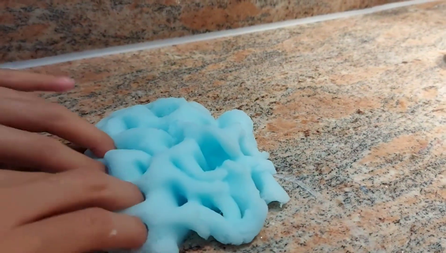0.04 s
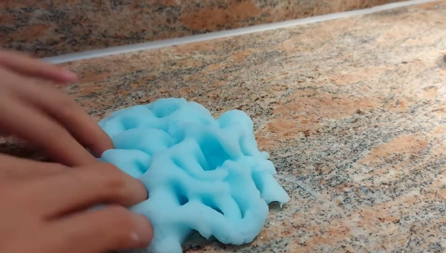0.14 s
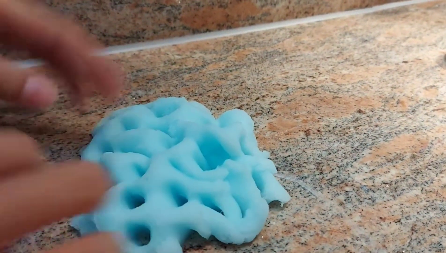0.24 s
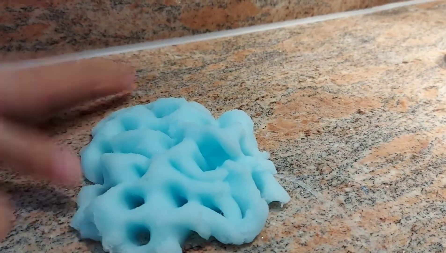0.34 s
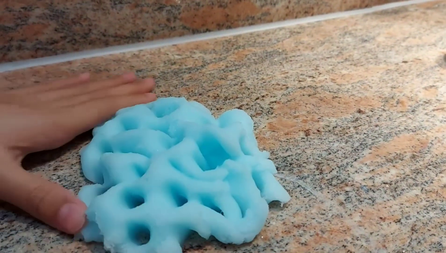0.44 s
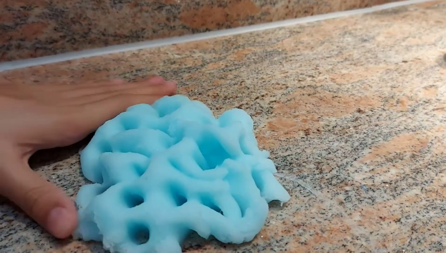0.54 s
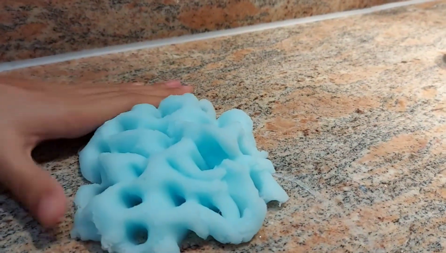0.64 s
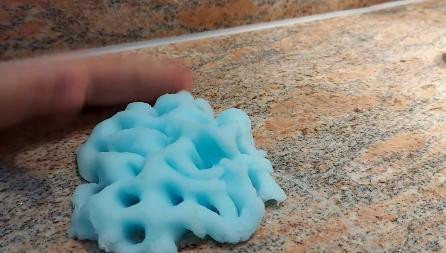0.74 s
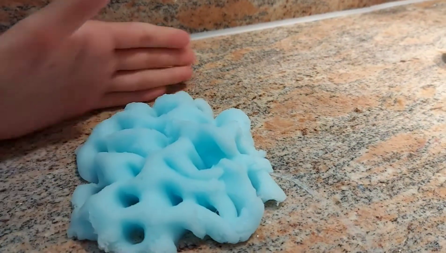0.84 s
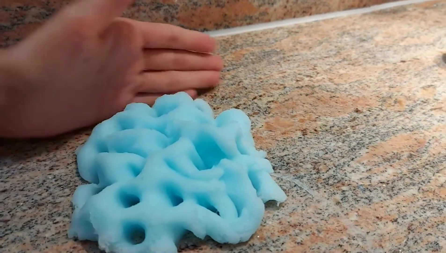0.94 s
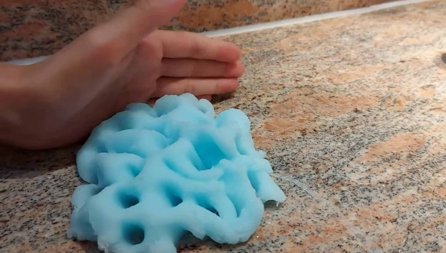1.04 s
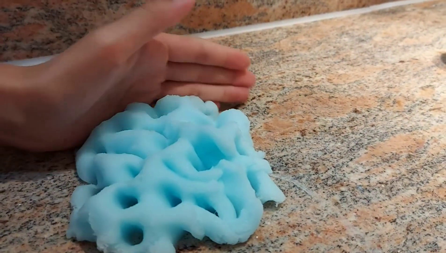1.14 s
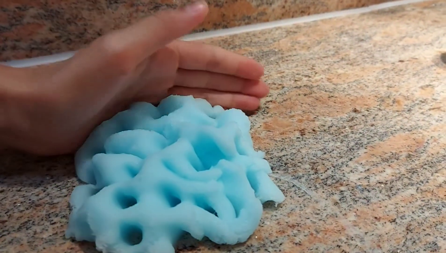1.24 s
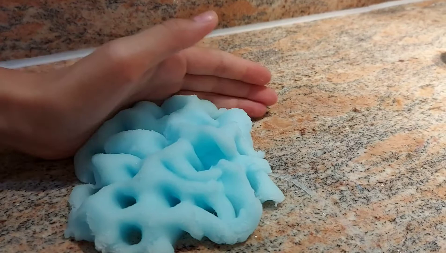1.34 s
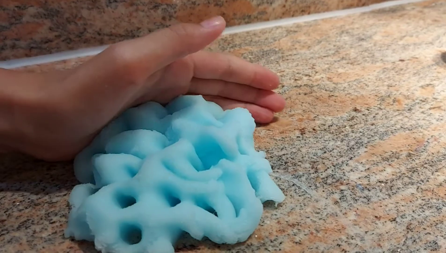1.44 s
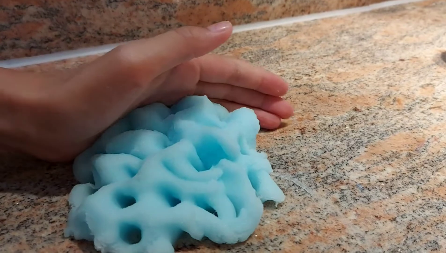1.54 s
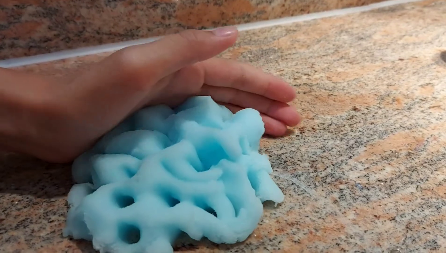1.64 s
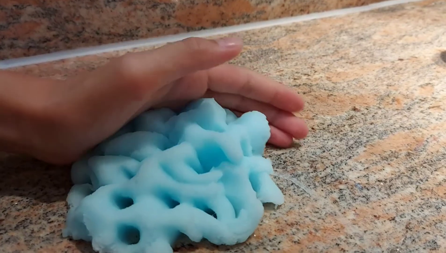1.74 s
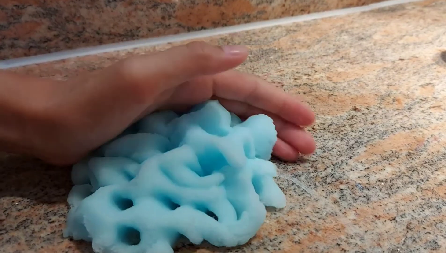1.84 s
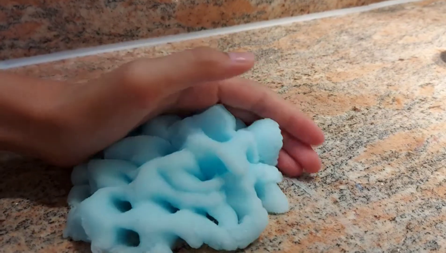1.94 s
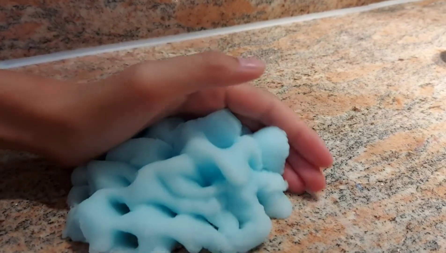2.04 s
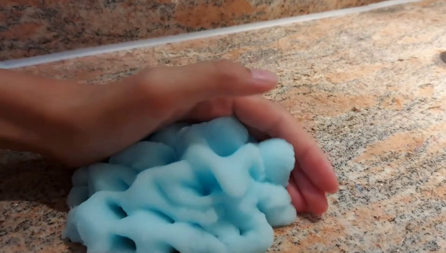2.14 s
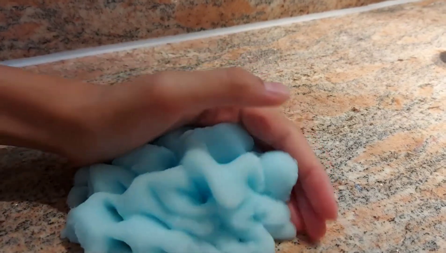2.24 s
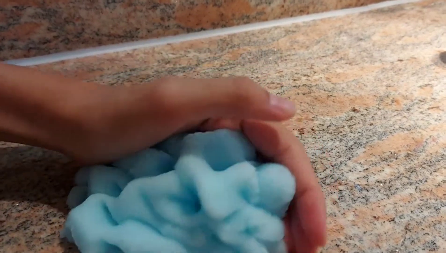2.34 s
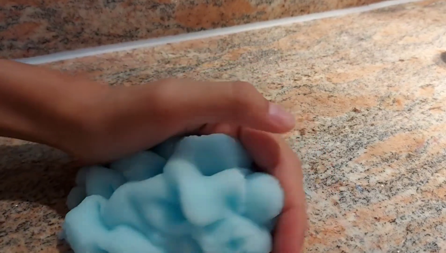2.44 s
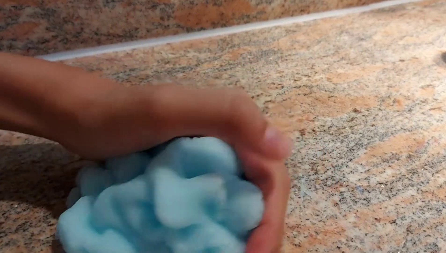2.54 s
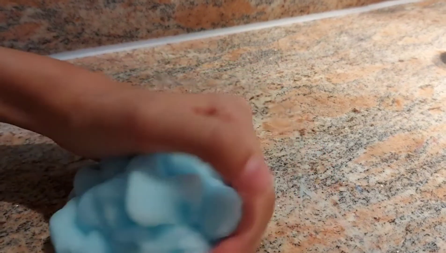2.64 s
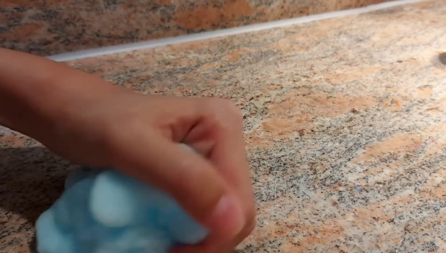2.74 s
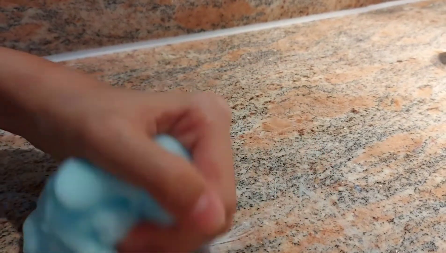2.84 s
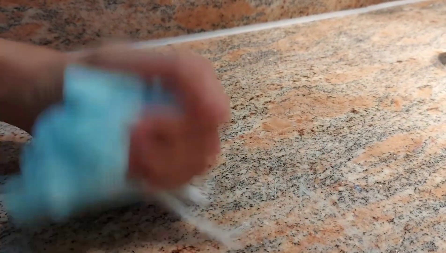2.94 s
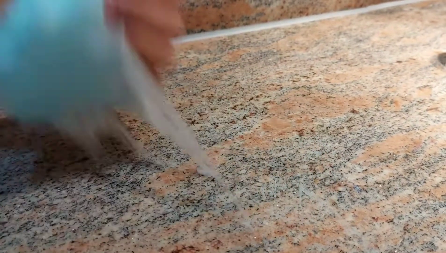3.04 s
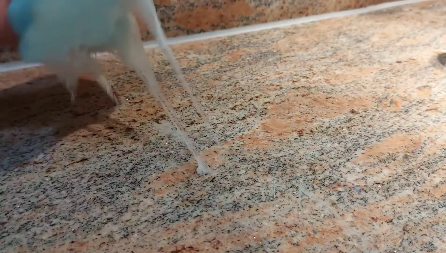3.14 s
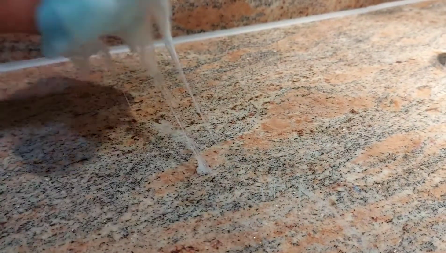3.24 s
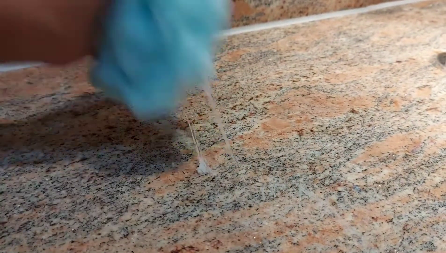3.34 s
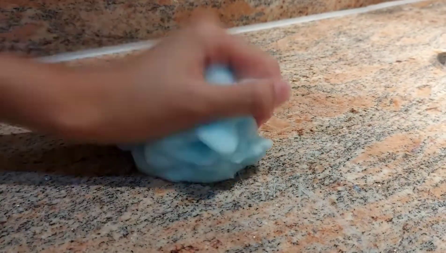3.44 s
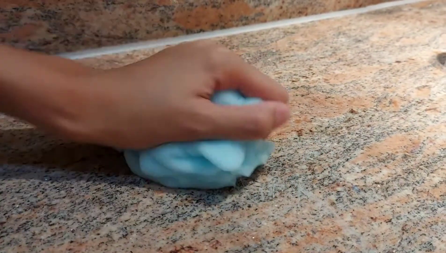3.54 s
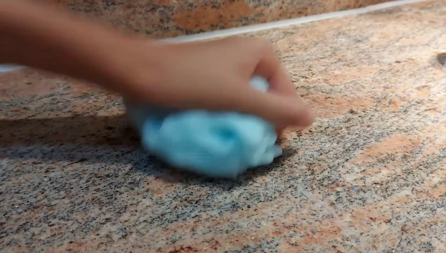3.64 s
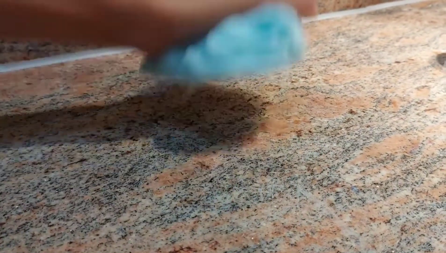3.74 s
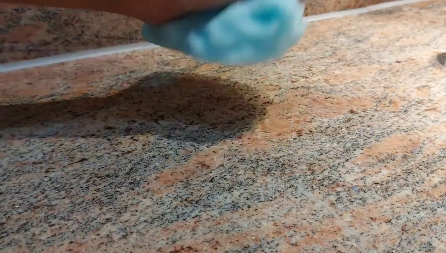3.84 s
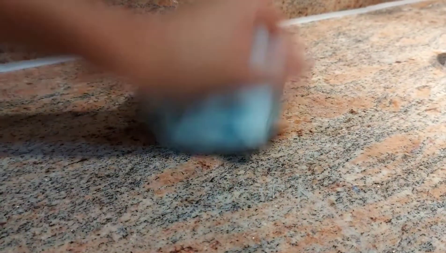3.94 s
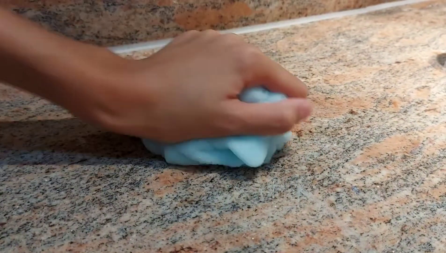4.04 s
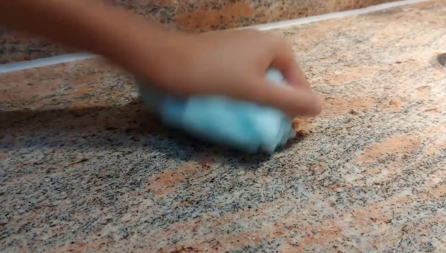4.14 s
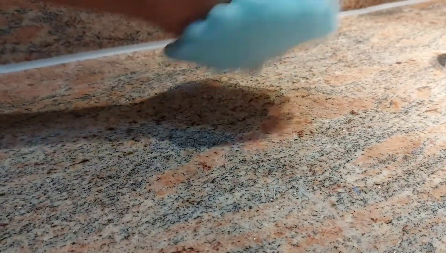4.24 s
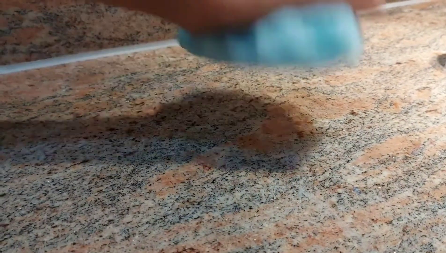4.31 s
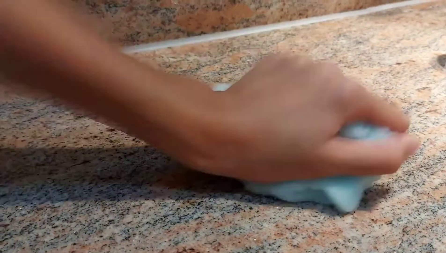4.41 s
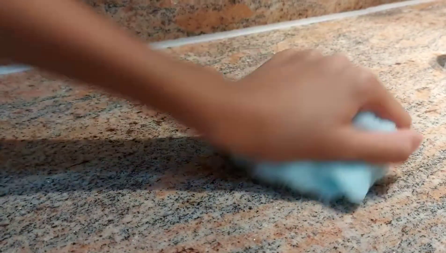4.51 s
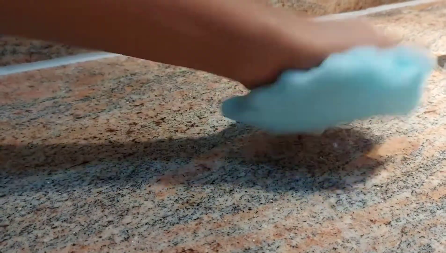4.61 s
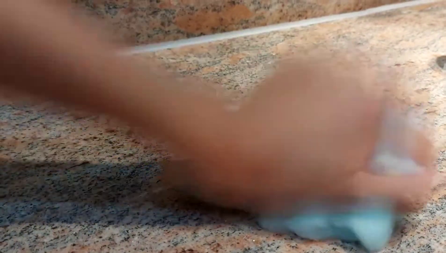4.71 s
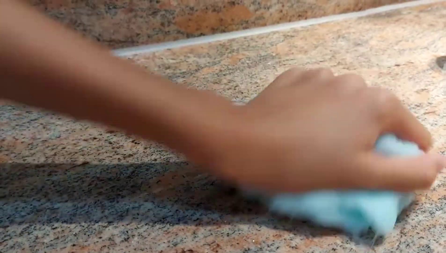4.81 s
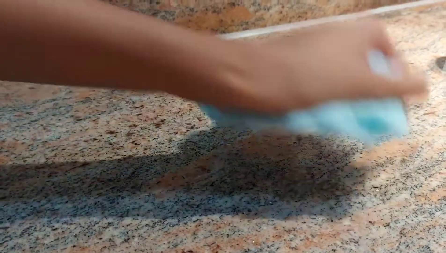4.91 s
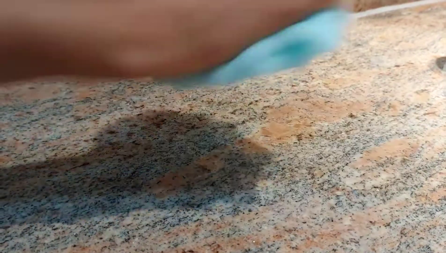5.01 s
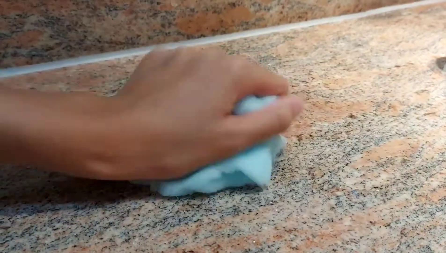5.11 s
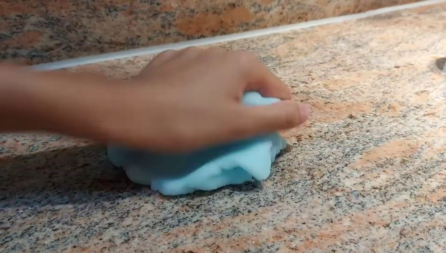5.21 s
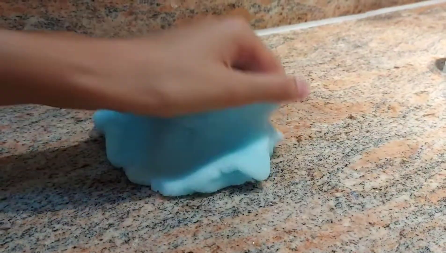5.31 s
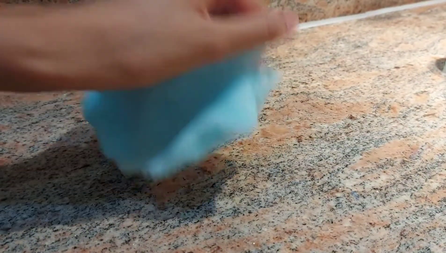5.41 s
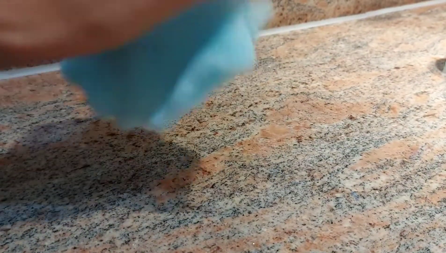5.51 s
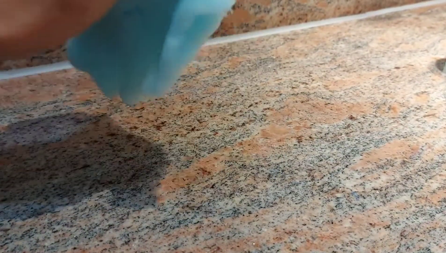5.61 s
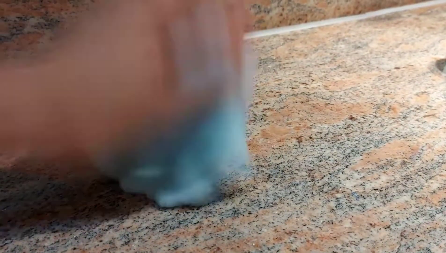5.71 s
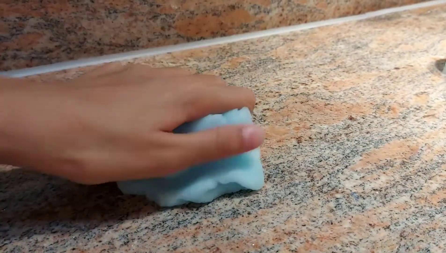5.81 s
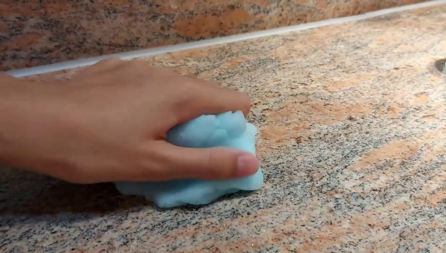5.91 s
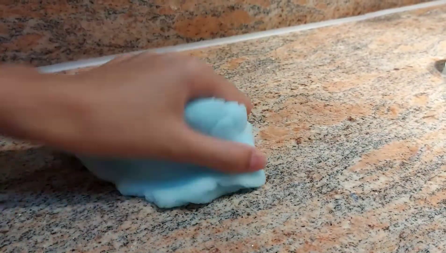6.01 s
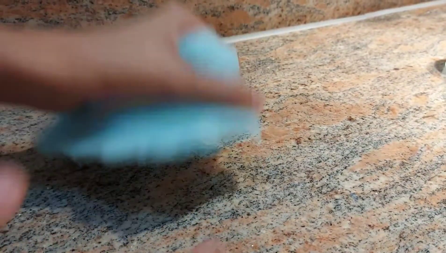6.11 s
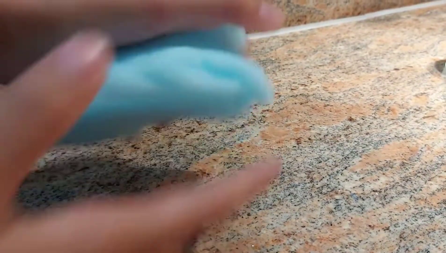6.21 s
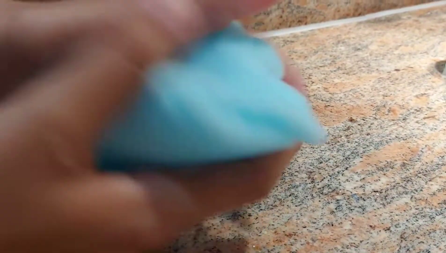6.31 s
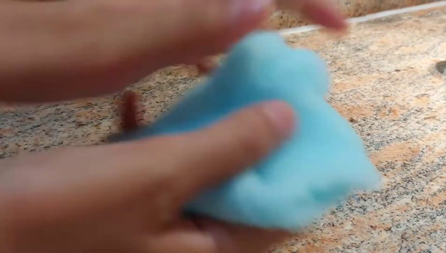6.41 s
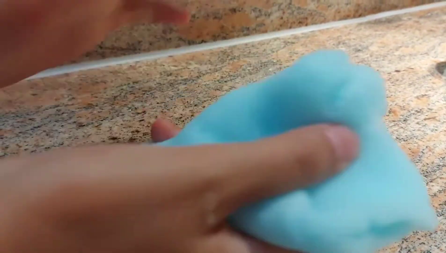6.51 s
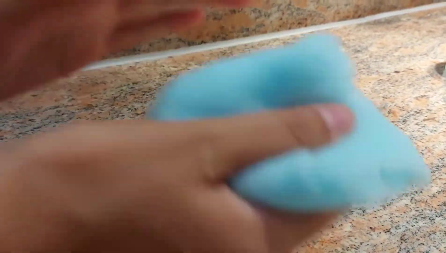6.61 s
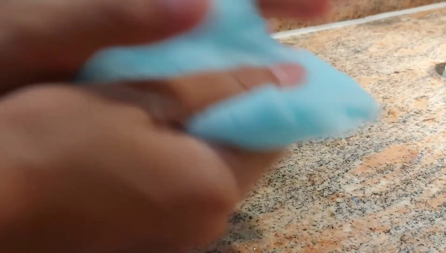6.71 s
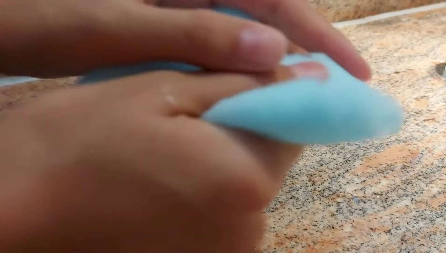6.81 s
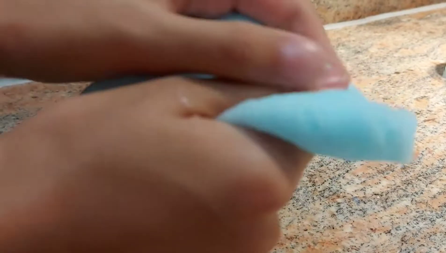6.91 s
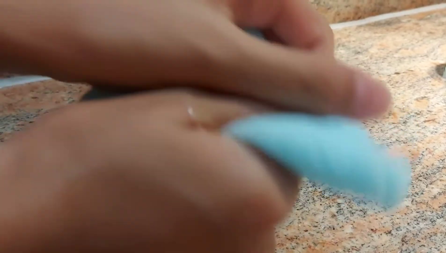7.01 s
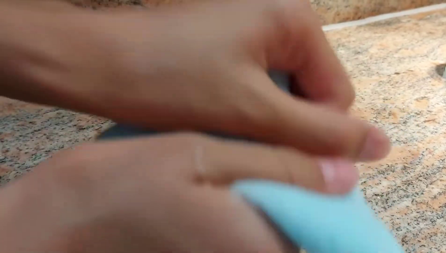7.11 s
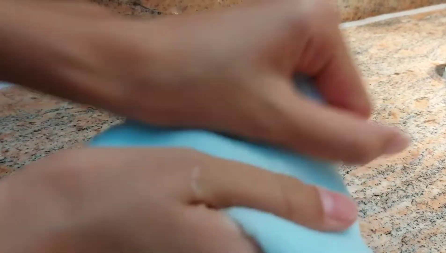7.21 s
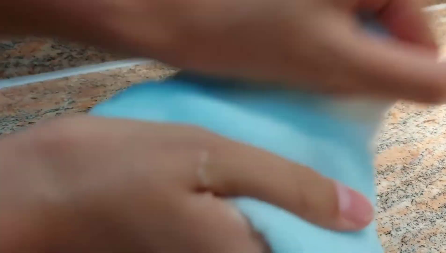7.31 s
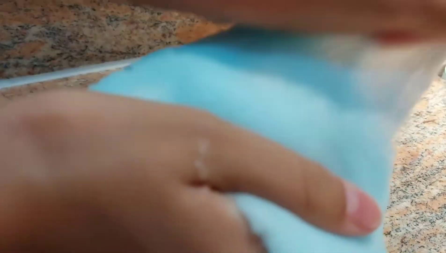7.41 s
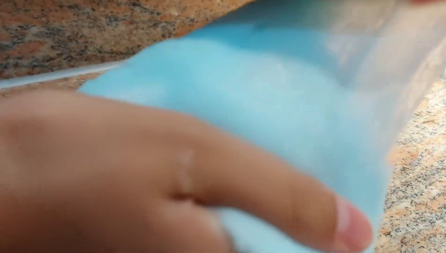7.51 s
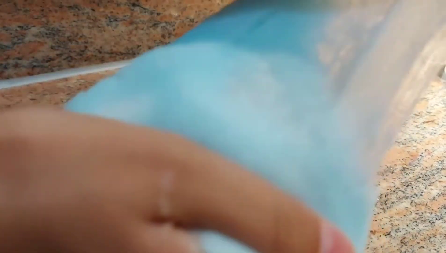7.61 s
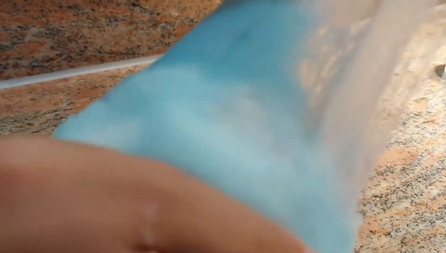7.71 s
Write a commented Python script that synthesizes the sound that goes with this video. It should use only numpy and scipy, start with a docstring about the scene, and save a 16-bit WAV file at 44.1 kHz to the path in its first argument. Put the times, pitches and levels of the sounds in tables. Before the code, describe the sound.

A phone close to a stone counter in a small, hard kitchen picks up slime in fine, bright detail over low fridge hum, a faint whine and room air. From 0 to 1 s fingers let go with sticky clicks, bubble pops and tiny crackles. Until 2.3 s it is nearly quiet, only faint ticks and wet rustle; two sharper pops come near 2.37. At 3.0 the slime peels up with a crisp crackle, with another tear at 3.8. Landings follow: soft at 4.05, firmer at 4.5, then very loud, wet slaps at 4.8 and 5.2 with a low thump, counter ring and short echo. Strong, dense tearing crackles come at 4.25, 4.65 and 4.95, a softer one at 5.45. A lighter pat lands at 5.84, with peeling near 6.2. Around 6.35-6.55 a fold squelches in sputtering, upward-sliding spurts; gentle stretching crackles and small clicks continue to the end.

```python
"""Slime on a kitchen counter

Hands gather soft slime, slap it on a stone counter and peel it off again, close to a phone.
Peeling is thousands of tiny random clicks; bubbles pop as short noise bursts; a fold squelches as
sliding tones. Slaps mix bursts of noise with rings of the counter, and a small hard room answers.
A fridge hums at multiples of the mains with a faint whine, over the quiet air of the room."""
import sys
import numpy as np
from scipy import signal
from scipy.fft import rfft, irfft, next_fast_len
from scipy.io import wavfile
from scipy.ndimage import uniform_filter1d

SR = 44100
rng = np.random.default_rng(int(sys.argv[2]) if len(sys.argv) > 2 else 0)


def unload_audio(sound):
    """Save the sound as a 16-bit wav file, at the path given as the first command line argument."""
    columns = np.transpose(np.atleast_2d(sound))
    # keep every value between -1 and 1, then stretch to whole-number steps
    steps = np.round(np.clip(columns, -1, 1) * 32767)
    wavfile.write(sys.argv[1], SR, steps.astype(np.int16))


N = 341775

# slime tearing off skin or stone: loudest t/s, swell length/s, sag length/s, crackle level/dB,
# swell/dB, wet part against the crackle/dB
PEELS = [(0.321, 0.065, .015, -50.5, 8, 3), (0.546, .015, 0.014, -60, 5, 1),
         (0.83, 0.12, 0.024, -59, 10, 6), (0.967, 0.025, 0.035, -55.5, 6, 2),
         (1.31, .05, 0.17, -66.5, 9, 12), (2.38, 0.048, 0.035, -58.5, 6, 3),
         (3.035, 0.08, 0.039, -41.5, 12.5, -2), (3.769, 0.067, 0.029, -41.5, 8, 1),
         (4.262, 0.12, 0.017, -37, 29.5, 1), (4.397, 0.027, 0.05, -59.5, 7, -2),
         (4.644, 0.042, 0.031, -37, 9, 0.5), (4.946, .045, 0.03, -36.5, 12.5, 0.5),
         (5.462, 0.18, 0.03, -45.5, 5.5, 1), (6.185, 0.044, 0.019, -42.5, 9, 2.5),
         (6.274, 0.0077, .1, -55.5, 3, 0.5), (6.468, 0.075, 0.034, -46.5, 11, 3.5),
         (7.003, .02, 0.042, -57.5, 2, 7.5), (7.203, .03, 0.023, -55.5, 7, -1)]
# slow stretching in the hands: t/s, crackle level/dB
STRETCH = [(0, -64.5), (.12, -63.5), (.21, -70.5), (.45, -67), (.7, -66), (.9, -83), (1.2, -79), (1.7, -73),
           (2.3, -72.5), (2.55, -68), (2.94, -54), (3.1, -74), (3.3, -68.5), (3.45, -76), (3.57, -61),
           (3.7, -62.5), (3.85, -84), (5.73, -81), (5.8, -62), (6.0, -77), (6.12, -62.5), (6.59, -67),
           (6.8, -56.5), (6.97, -61.5), (7.13, -66), (7.42, -54.5), (7.63, -60.5)]
# faint wet rustle in the middle range: t/s, level/dB
RUSTLE = [(0, -67), (1.1, -66), (2.1, -69), (2.6, -72), (3.2, -65.5), (3.9, -66), (5.5, -65), (5.7, -84),
          (6.1, -84), (6.35, -56), (6.6, -64), (7.75, -74)]
# tone colour of the crackle: f/Hz, level/dB
CRACKLE_COLOUR = [(2000, -50), (3200, -11.5), (4300, -3), (6500, -1.5), (8800, -2.5), (10500, -16),
                  (13000, -37)]
# tone colour of the finest air pockets: f/Hz, level/dB
FINE_COLOUR = [(7000, -45), (9000, -15.5), (10300, -6), (11900, -1.5), (15200, -5), (15700, -32.5)]
# tone colour of the wet part: f/Hz, level/dB
WET_COLOUR = [(200, -57.5), (500, -0.5), (900, -3), (1500, 2), (2600, -0.5), (3600, -6.5), (6000, -60.5)]
# single bubbles bursting: t/s, tick level/dB, tick centre f/Hz, low part level/dB, low part f/Hz,
# left minus right/dB, rise/s
POPS = [(0.2676, -32, 5600, -32, 1360, -1, 0.00012), (0.2808, -36, 8350, -40, 1300, 0, .003),
        (.304, -23.5, 9400, -29, 1440, 2, .0001), (.3052, -34.5, 4350, -50, 2300, -3, 0.00054),
        (.3174, -33, 11900, -49, 1420, -3, .0002), (0.51, -34, 9620, -44, 4300, 0, 0.00091),
        (.515, -25.5, 11100, -44, 900, -1.5, 0.0069), (.661, -41.5, 11400, -60, 900, 2, .0002),
        (.6918, -55, 8860, -46, 2110, 3, .0036), (.952, -40, 10400, -49, 1400, 8, .0002),
        (1.1935, -42.5, 12100, -60, 1390, -4, .0002), (1.5935, -47, 11300, -63, 1380, 1, .0002),
        (1.7212, -51, 8490, -60, 1380, -4, .0002), (1.761, -44, 11900, -64, 1890, -2, .0002),
        (1.9105, -47, 8900, -67, 1380, -2, .0002), (1.983, -51, 7330, -68, 1540, -9, .0002),
        (2.2848, -46, 8100, -63, 1390, -1, .0002), (2.3663, -28.5, 7400, -34, 3330, -8, .00015),
        (2.3724, -29, 7340, -39, 980, -2, 0.0024), (2.4978, -47, 11900, -65, 1400, 0, .0002),
        (3.0346, -33, 12100, -54, 2520, 0, .0002), (3.511, -41.5, 7000, -59, 1500, -6, .0001),
        (3.54, -38.5, 11900, -53, 1530, 2, .005), (3.658, -43, 12200, -56, 1420, 0, .0002),
        (3.761, -35, 10900, -39, 950, 16, .002), (4.206, -49, 12300, -36, 1580, 10, 0.0016),
        (5.3428, -35, 12900, -33.5, 2640, 5, .0012), (5.4135, -39, 11600, -31.5, 1320, 6, .002),
        (5.7465, -48, 8600, -68, 1830, -9, 0.002), (5.8113, -45, 5220, -44, 1480, 7, .0001),
        (6.0097, -49, 5440, -68, 1360, -8, .0008), (6.261, -46, 7530, -45, 1460, 0, .001),
        (6.98, -35, 11100, -40, 3300, -7, .003), (7.197, -39.5, 7000, -50, 1840, -4, 0.0025)]
# strong spurts of air squeezed out of a fold: t/s, relative level/dB, starting cavity f/Hz
SQUELCH = [(6.354, -37.5, 2440), (6.366, -42, 2250), (6.399, -32.5, 2080), (6.404, -28.5, 1420),
           (6.449, -30, 1390), (6.462, -24.5, 1025), (6.477, -33, 1440), (6.824, -46, 1430)]
# small spurts between and after them: t/s, relative level/dB, upper resonance against the lower/dB
SPUTTER = [(6.41, -37, 3), (6.445, -37, -1), (6.49, -31.5, -11), (6.53, -38.5, -14), (6.58, -53, -14)]
# the lump landing on stone: t/s, crack level/dB, smack relative level/dB, smack f/Hz,
# second smack resonance against the first/dB, counter ring level/dB, thump level/dB,
# thud level/dB, thud tilt/dB per octave, crack t60/s
SLAPS = [(4.0530, -27, -28, 1400, -12, -43, -30, -40, -2, 0.079),
         (4.4964, -15.5, -29, 2200, 0, -29, -20.5, -32.5, 2, 0.051),
         (4.82, -5, -6, 960, 1, -14.5, -12.5, -21.5, 1.5, 0.034),
         (5.1850, -3.5, -8.5, 1290, -15, -7, -13.5, -14.5, 2.5, 0.033),
         (5.8436, -19.5, -38, 900, -6, -44, -43, -47.5, -1, 0.017)]
# dense wet thud of the lump, band by band: centre f/Hz, relative level/dB, t60/s
THUD_BANDS = [(167.5, -8, 0.96), (251.7, 2.5, 0.36), (334, -5, 0.43), (530, 1.5, 0.31), (724, -2.5, 0.16),
              (1165, 1.5, 0.071), (1850, 3, 0.041), (2660, -18.5, 0.19), (4200, -12, .12)]
# ringing modes of the counter: f/Hz, relative level/dB, t60/s before a cap
COUNTER_MODES = [(230, -20.5, 5.0), (289.2, 10.5, 0.1), (458, 31.5, 0.34), (531.4, 3.5, 0.21),
                 (756, -40, 0.55), (837, -19.5, 0.13), (1020, -23.5, 0.33), (1066, -24, 0.41),
                 (1142, 4, 0.087), (1270, -20, 0.3), (1380, -20, 0.41), (1450, 10, 0.33)]
# low modes of cabinet and room: f/Hz, relative level/dB, t60/s before a cap
THUMP_MODES = [(45.7, -19, .55), (56.5, -3.5, 0.52), (72.2, 3.5, 0.82), (99.8, -13.5, 0.47),
               (144.3, -17, .25)]
# hands resting or bumping on the counter: t/s, thump level/dB, knock level/dB
BUMPS = [(0.456, -43, -39), (0.526, -50, -44), (1.252, -48, -46), (3.42, -42, -53), (3.76, -50, -40),
         (7.299, -50, -48)]
# how long the room rings in each band: centre f/Hz, t60/s
ROOM = [(120, 0.44), (420, 0.35), (1100, 0.3), (2900, 0.36), (7700, 0.19), (14000, 0.074)]
# fridge hum: multiple of the mains frequency, level/dB rms around which it wavers
HUM = [(2, -52.5), (3, -59), (4, -64.5), (6, -59.5), (8, -68.5)]
# fridge whine: centre f/Hz, width/Hz, level/dB rms around which it wavers
WHINE = [(600.5, 20, -71.5), (1400, 51, -67), (1532, 53, -73), (1897, 27, -71), (2028, 29, -75.5),
         (2586, 140, -72), (4260, 93, -78), (4760, 420, -71)]
# tone colour of the air in the room: f/Hz, relative level/dB per Hz
AIR_COLOUR = [(15, -50), (25, -18.5), (104, -4), (240, -7), (400, -7), (510, -22), (923, -27),
              (1380, -29.5), (1910, -20.5), (2240, -66), (2780, -25), (3100, -40), (4060, -31), (4770, -37),
              (15600, -33)]
# how alike left and right are: f/Hz, likeness/0-1
ALIKE = [(60, 0.02), (150, 0.89), (300, 0.47), (640, 0.4), (1300, 0), (16000, 0)]
# tone colour of the phone's microphone: f/Hz, level/dB
MIC = [(20, -1), (1300, 0), (1600, -1.5), (2000, -1.5), (2400, -1), (3100, -0.5), (4000, 4), (5000, 3.5),
       (15200, -1), (15900, -23.5), (20000, -21.5)]

# a tear catches, swells to its loudest, sags, lets go at once and leaves a few strings crackling
CATCH_S, SAG_DB, LET_GO_S, STRINGS_DB, STRINGS_DB_PER_S = .012, 6.5, 0.017, -21, 200
# the lump settles after each landing: level for a 0 dB thud, share of the thud's dB, fade, wet part
SETTLE_DB, SETTLE_SHARE, SETTLE_DB_PER_S, SETTLE_WET_DB = -21.5, 0.73, 257.5, 7.5
STRETCH_WET_DB, FINE_DB = -8, 4.5  # wet part and finest pockets against the crackle
POP_T60_S, T60_PER_RISE = 0.024, 3.3  # a bubble that opens slowly also rings longer
FAINT_PER_S, FAINT_DB = 4, -57  # tiny bubbles that tick at random; lowest level
SPUTTER_GAP_S, SPUTTER_HZ, SPUTTER_SCATTER_DB = 0.0081, 1405, 1.5
UPPER_DB, SPURT_T60_S = -12, 0.025  # upper resonance of the cavity in strong spurts; fade of all spurts
SMACK_UPPER = 2.12  # second smack resonance, multiple of the first
LANDING_PLACE = .335  # along the counter, 0-1
ROOM_DB, AIR_DB, MAINS_HZ, TOP_HZ = -9.5, -53.5, 50.2, 16400

SIZE = next_fast_len(N + SR)  # padded, so that filter tails do not wrap round
HZ = np.maximum(np.arange(SIZE // 2 + 1) * SR / SIZE, 1)
TIME = np.arange(N) / SR


def peel():
    """Air pockets tear open thousands of times a second, in uneven sizes and slight flurries."""
    dry_gain, wet_gain = tearing()
    sizes = undb(1.5 * rng.exponential(1, (2, N)))
    tears = (rng.random((2, N)) < 9000 / SR) * rng.standard_normal((2, N)) * sizes
    slurps = (rng.random((2, N)) < 6000 / SR) * rng.standard_normal((2, N))
    flurry, fine_flurry, wet_flurry = (undb(1.2 * walk(rate)) for rate in (70, 110, 50))
    crackle = level(shape(tears, undb(on_hz(CRACKLE_COLOUR))), -0.37) * flurry
    fine = level(shape(tears, undb(on_hz(FINE_COLOUR))), -1.18) * fine_flurry * undb(FINE_DB)
    wet = level(shape(ports(*slurps), undb(on_hz(WET_COLOUR))), -2.1) * wet_flurry
    return (crackle + fine) * dry_gain + wet * wet_gain


def tearing():
    """Gains of the crackle and its wet part: stretching, tears and settling add up as power."""
    crackle = undb(np.interp(TIME, *np.transpose(STRETCH))) ** 2
    rustle = undb(np.interp(TIME, *np.transpose(RUSTLE))) ** 2
    wet = crackle * undb(STRETCH_WET_DB) ** 2 + rustle
    curves = []
    for loudest, swell_s, sag_s, db, swell_db, wet_db in PEELS:
        start, end = loudest - swell_s, loudest + sag_s
        gone = end + LET_GO_S
        # the points in time must never run backwards
        s = np.maximum.accumulate([start - CATCH_S, start, loudest, end, gone, gone + 1])
        steps = [-swell_db - 20, -swell_db, 0, -SAG_DB, STRINGS_DB, STRINGS_DB - STRINGS_DB_PER_S]
        curves.append((s, db + np.array(steps), wet_db))
    for slap in SLAPS:
        thud_db = slap[-3]
        settle_db = SETTLE_DB + SETTLE_SHARE * thud_db - np.array([30, 0, SETTLE_DB_PER_S])
        curves.append((slap[0] + np.array([0, .02, 1.02]), settle_db, SETTLE_WET_DB))
    for s, db, wet_db in curves:
        power = undb(np.interp(TIME, s, db, left=-200)) ** 2
        crackle = crackle + power
        wet = wet + power * undb(wet_db) ** 2
    return np.sqrt(crackle), np.sqrt(wet)


def pops():
    """Each bubble: a bright tick around its own pitch and a duller click of the collapsing skin."""
    out = np.zeros((2, N))
    for s, db, hz, low_db, low_hz, pan_db, rise_s in list(POPS) + faint():
        t60 = POP_T60_S + T60_PER_RISE * rise_s
        tick = undb(db) * burst(hz / 1.31, hz * 1.31, t60, rise_s)
        click = undb(low_db) * burst(low_hz / 1.38, low_hz * 1.36, 0.81 * t60, rise_s)
        add(out, s, (tick + click) * undb([[pan_db / 2], [-pan_db / 2]]))
    return out


def faint():
    """Tiny bubbles as rows like POPS: random moment, size, pitch and side."""
    chance = rng.random((80, 4))
    at = np.cumsum(-np.log(1 - chance[:, 0]) / FAINT_PER_S)  # random waits
    rows = []
    for s, (_, size, pitch, side) in zip(at, chance):
        if s < TIME[-1]:
            rows.append((s, FAINT_DB + 6 * size, 7000 + 5000 * pitch, FAINT_DB - 14, 1400,
                         8 * (side - .5), .0002))
    return rows


def squelch():
    """Each spurt of air rings two resonances of the little cavity in the fold, sliding up as it shrinks."""
    out = np.zeros((2, N))
    t, decay = fade(SPURT_T60_S, longest_s=.125)
    swell = 1 - np.exp(-(t / 0.0013) ** 2)  # the walls give way, so the ring swells for a moment
    for s, db, hz, upper_db in spurts():
        turn = 2 * np.pi * hz * t * (1 + 3.0 * t) + np.array([[0], [1.6]])  # phase at left and right
        tones = np.sin(turn) + undb(upper_db) * np.sin(1.4 * turn)
        add(out, s, undb(db) * tones * decay * swell * 1.6)
    return out


def spurts():
    """Strong spurts and an uneven sputter of small ones: t/s, relative level/dB, f/Hz, upper/dB."""
    s, db, upper_db = np.transpose(SPUTTER)
    chance = rng.standard_normal((40, 3))
    at = s[0] + SPUTTER_GAP_S * (np.arange(len(chance)) + 0.255 * chance[:, 0])
    small_db = np.interp(at, s, db) + SPUTTER_SCATTER_DB * chance[:, 1]
    small_hz = SPUTTER_HZ * (1 + 0.047 * chance[:, 2])
    small = np.transpose([at, small_db, small_hz, np.interp(at, s, upper_db)])
    strong = [tuple(row) + (UPPER_DB,) for row in SQUELCH]
    return strong + list(small[at < s[-1]])


def slaps():
    """Smack and crack of trapped air, thud and ring of the counter; the low thump swells more slowly."""
    cracks, body, lows = np.zeros((2, N)), np.zeros((2, N)), np.zeros(N)
    t, decay = fade(0.0083, longest_s=.125)
    for s, db, smack_db, smack_hz, upper_db, ring_db, thump_db, thud_db, tilt_db, t60 in SLAPS:
        add(cracks, s, undb(db) * burst(1800, 16000, t60))
        # the air cushion under the lump bounces briefly
        turn = 2 * np.pi * smack_hz * t + np.array([[0], [.8]])
        bounce = np.sin(turn) - undb(upper_db) * np.sin(SMACK_UPPER * turn)
        add(cracks, s, -undb(smack_db) * bounce * decay * (1 - np.exp(-t / 0.0003)) * 2)
        for hz, band_db, band_t60 in THUD_BANDS:
            gain = undb(thud_db + band_db + tilt_db * np.log2(hz / 500))
            add(body, s, gain * burst(hz / 1.25, hz * 1.25, band_t60, longest_s=.5))
        add(body[0], s, undb(ring_db) * ring(COUNTER_MODES, LANDING_PLACE, .0015, .45))
        add(lows, s, undb(thump_db) * ring(THUMP_MODES, 0.6796, 0.024, 1.0))
    for s, db, knock_db in BUMPS:
        add(lows, s, undb(db) * ring(THUMP_MODES, .7, .03, .75))
        add(body, s, undb(knock_db) * burst(80, 330, 0.18, 0.0035))
    # the thump travels through the slab and shakes the right port a little harder
    return cracks + heard(body), lows * undb([[-.8], [.8]])


def ring(modes, place, rise_s, most_t60):
    """Modes of a struck body; the landing place favours some of them; peak 1."""
    out = np.zeros(SR)
    for k, (hz, db, t60) in enumerate(modes):
        t, decay = fade(min(t60, most_t60))
        gain = -undb(db) * np.sin(np.pi * place * (k + 1))
        add(out, 0, gain * np.sin(2 * np.pi * hz * t) * decay * (1 - np.exp(-t / rise_s)))
    return out / np.abs(out).max()


def burst(lo_hz, hi_hz, t60, rise_s=.0001, longest_s=.125):
    """A band of noise that starts with a snap or short swell and dies, peak 1, different at each port."""
    t, decay = fade(t60, longest_s)
    sos = signal.butter(2, [lo_hz, hi_hz], "bandpass", fs=SR, output="sos")
    x = rng.standard_normal((2, len(t)))
    x[0, 4], x[1, 8] = -6, -6  # the snap, four samples later on the right
    x = signal.sosfilt(sos, x * decay * (1 - np.exp(-t / rise_s)))
    return x / np.abs(x).max(axis=1, keepdims=True)


def heard(pair):
    """Like ports, but through causal filters, so that nothing sounds before a blow."""
    low, high = (signal.butter(1, 700, kind, fs=SR, output="sos") for kind in ("low", "high"))
    middle = signal.sosfilt(low, pair[0]) + 0.85 * signal.sosfilt(high, pair[0])
    side = signal.sosfilt(high, pair[1])
    return middle + 1.4 * np.array([side, -side])


def room(x):
    """Hard kitchen walls: a dense tail of noise, each band dying at its own speed."""
    tail, t = np.zeros((2, SR)), np.arange(SR) / SR
    edges = [40] + [np.sqrt(a[0] * b[0]) for a, b in zip(ROOM, ROOM[1:])] + [18000]
    rise = 1 - np.exp(-(t / 0.004) ** 2)
    for (hz, t60), lo, hi in zip(ROOM, edges, edges[1:]):
        sos = signal.butter(2, [lo, hi], "bandpass", fs=SR, output="sos")
        band = signal.sosfilt(sos, rng.standard_normal((2, SR)))
        tail += band * np.exp(-np.log(1000) * t / t60) * rise
    tail = ports(*np.pad(tail, ((0, 0), (0, N - SR))))
    tail = tail / np.sqrt((tail ** 2).sum(axis=1).mean())  # unit energy
    return shape(x.mean(axis=0), rfft(tail, SIZE)) * undb(ROOM_DB)


def fridge():
    """Wavering mains multiples, narrow whining bands of noise, the air of the room and a far rumble."""
    hum, whine = np.zeros((2, N)), np.zeros((2, N))
    for k, db in HUM:
        phase = 6 * rng.random() + np.array([[0], [k * 0.053]])
        waver = undb(db + 3.3 * walk(32))
        hum += np.sqrt(2) * waver * np.sin(2 * np.pi * k * MAINS_HZ * TIME + phase)
    for hz, width, db in WHINE:
        peak = 1 / (1 + ((HZ - hz) / (width / 2)) ** 2)
        whine += level(shape(rng.standard_normal((2, N)), peak), db) * undb(1.5 * walk(7))
    air = shape(ports(*rng.standard_normal((2, N))), undb(on_hz(AIR_COLOUR)))
    air = level(air, AIR_DB) * undb(2.37 * walk(2.0))
    # far rumble through the cabinet comes and goes
    rumble = shape(rng.standard_normal(N), 1 / (1 + ((HZ - 58) / 16) ** 4))
    rumble = level(rumble, -64.5) * undb(3.5 * walk(10))
    return hum + whine + air + rumble


def ports(a, b):
    """Two unrelated signals heard by two ports, as alike in each frequency range as ALIKE says."""
    alike = np.clip(on_hz(ALIKE), 0, 1)
    mid = shape(a, np.sqrt((1 + alike) / 2))
    side = shape(b, np.sqrt((1 - alike) / 2))
    return np.array([mid + side, mid - side])


def undb(db):
    """Decibels to gain."""
    return 10 ** (np.asarray(db) / 20)


def on_hz(points):
    """Values joined by lines on a log-frequency axis."""
    hz, value = np.transpose(points)
    return np.interp(np.log(HZ), np.log(hz), value)


def shape(x, gain):
    """Filter by a gain per frequency."""
    return irfft(rfft(x, SIZE) * gain, SIZE)[..., :N]


def level(x, db):
    """Set the rms level, a kind of average loudness."""
    return x * undb(db) / np.sqrt(np.mean(x ** 2))


def walk(rate):
    """A slow random drift: noise averaged twice over 1 / rate seconds; spread 1."""
    k = int(SR / rate)
    x = uniform_filter1d(uniform_filter1d(rng.standard_normal(N), k), k)
    return x / x.std()


def fade(t60, longest_s=.75):
    """Time axis and exponential decay of a ring, which falls by 60 dB in t60 seconds."""
    t = np.arange(int(longest_s * SR)) / SR
    return t, np.exp(-np.log(1000) * t / t60)


def add(out, s, sound):
    """Mix a sound in at time s."""
    i = int(s * SR)
    n = min(sound.shape[-1], out.shape[-1] - i)
    out[..., i:i + n] += sound[..., :n]


def scene():
    """Near sounds with their room, over the steady background."""
    hits, lows = slaps()
    bubbles, fold, skin = pops(), squelch(), peel()
    shaded = .5 * fold  # the hands cup the fold and shade it from the walls
    echoes = room(hits + 1.8 * bubbles + shaded + 0.72 * skin)
    return hits + bubbles + fold + skin + echoes + lows + fridge()


def record(dry):
    """The phone drops the deepest bass, colours the tone, clips peaks past full scale and cuts the top."""
    coloured = shape(dry, undb(on_hz(MIC)))
    x = signal.sosfilt(signal.butter(3, 36, "highpass", fs=SR, output="sos"), coloured)
    top_cut = signal.ellip(12, .2, 100, TOP_HZ, fs=SR, output="sos")
    return signal.sosfilt(top_cut, np.clip(x, -1, 1))


dry = scene()
out = record(dry)
unload_audio(out)
```